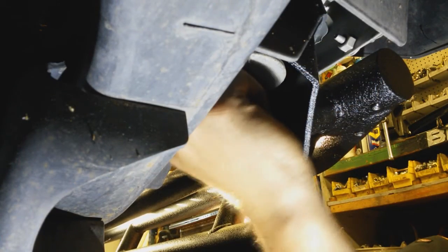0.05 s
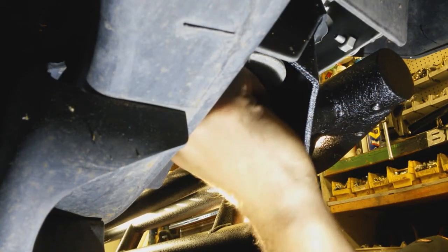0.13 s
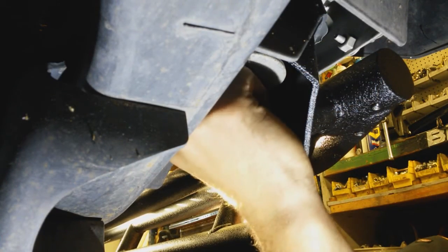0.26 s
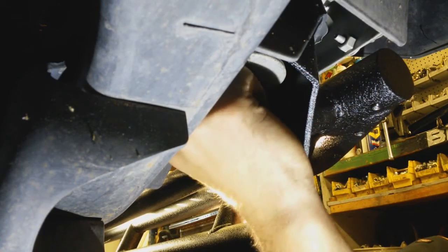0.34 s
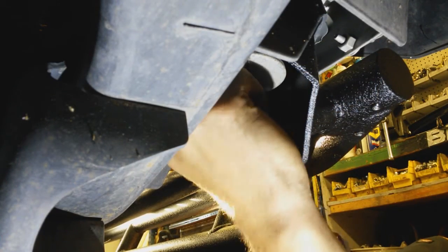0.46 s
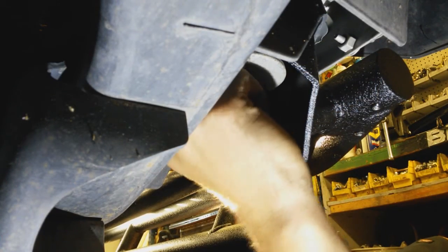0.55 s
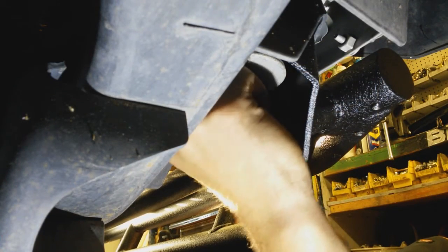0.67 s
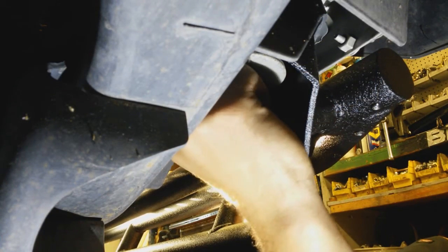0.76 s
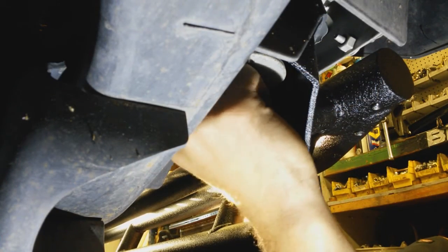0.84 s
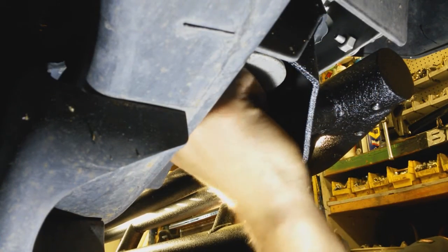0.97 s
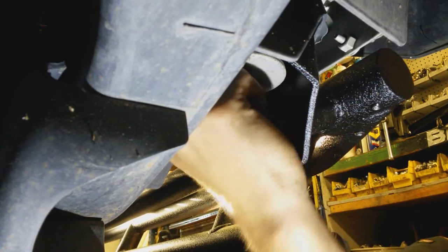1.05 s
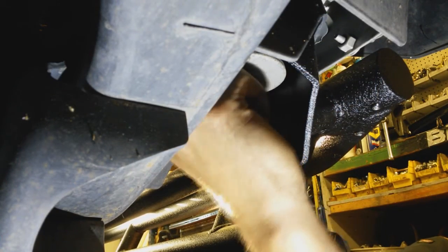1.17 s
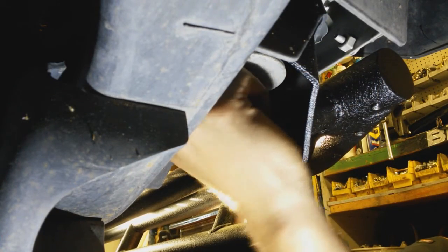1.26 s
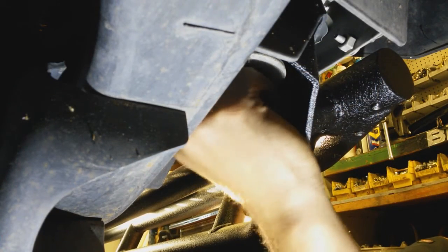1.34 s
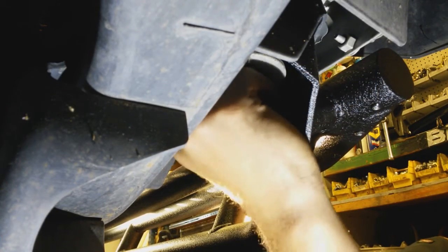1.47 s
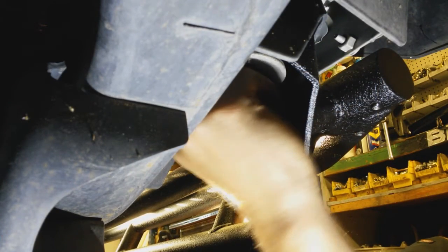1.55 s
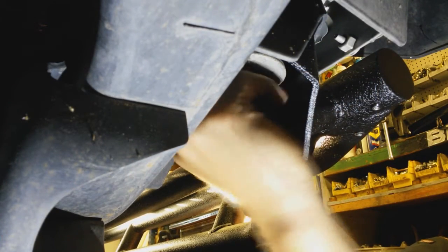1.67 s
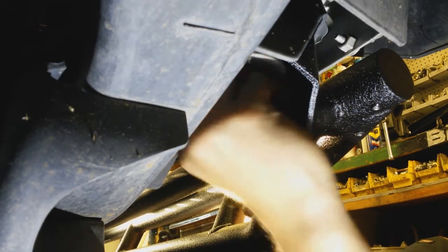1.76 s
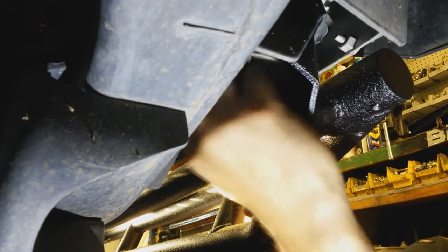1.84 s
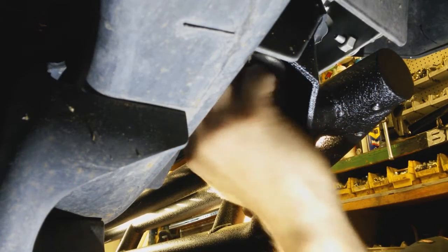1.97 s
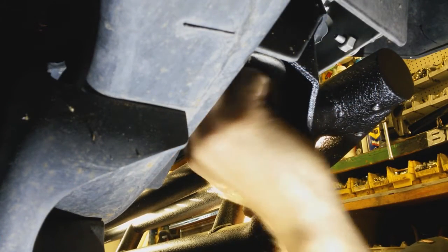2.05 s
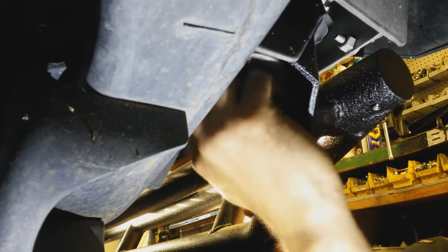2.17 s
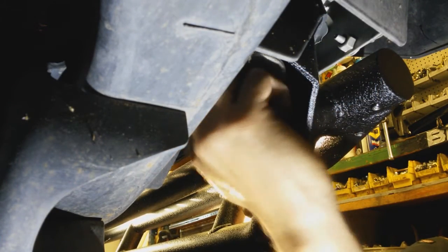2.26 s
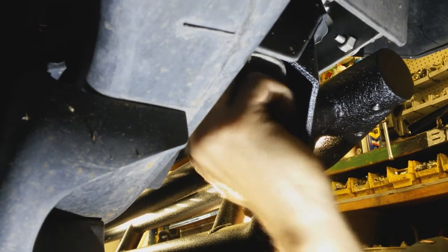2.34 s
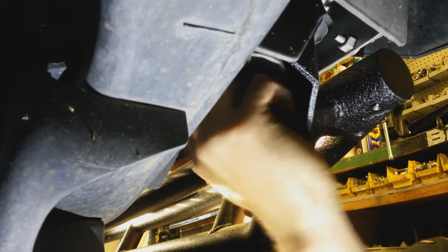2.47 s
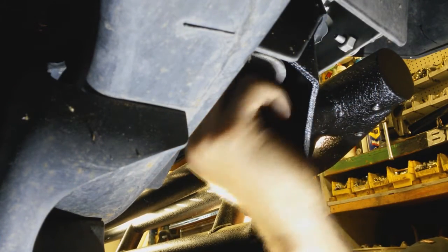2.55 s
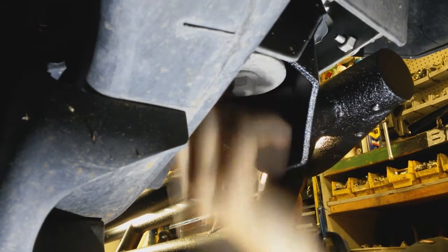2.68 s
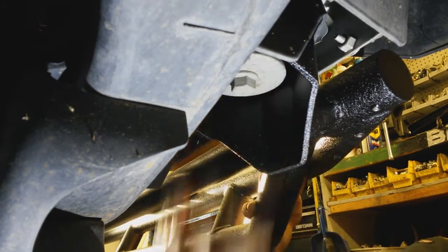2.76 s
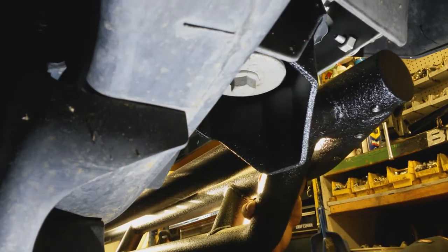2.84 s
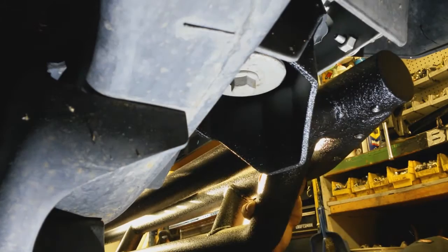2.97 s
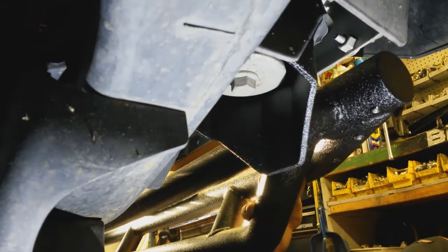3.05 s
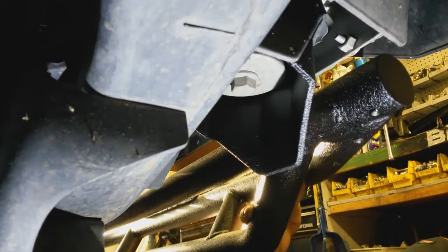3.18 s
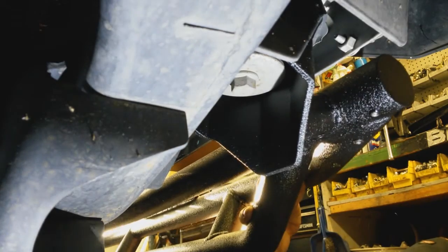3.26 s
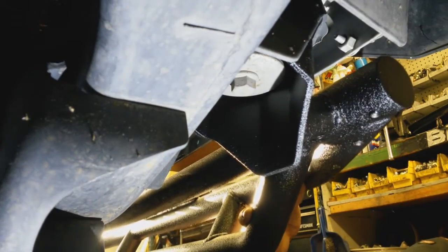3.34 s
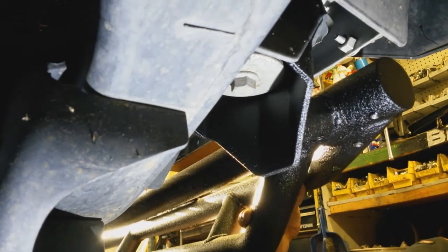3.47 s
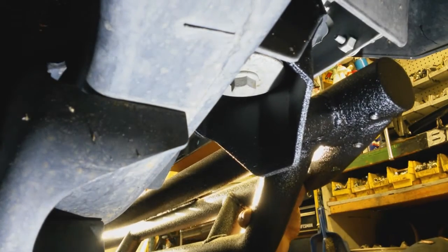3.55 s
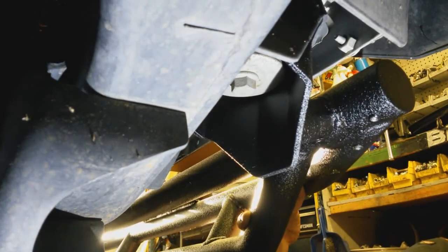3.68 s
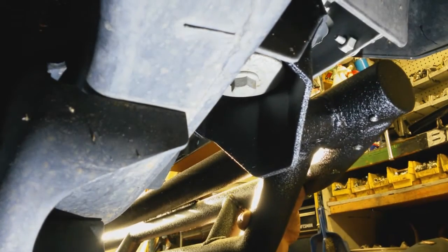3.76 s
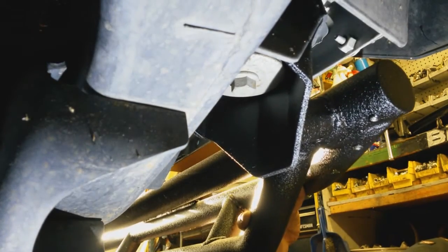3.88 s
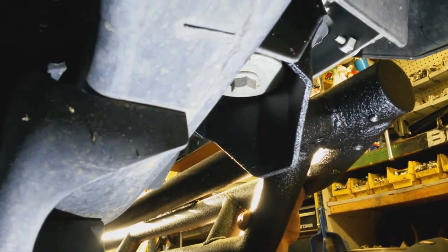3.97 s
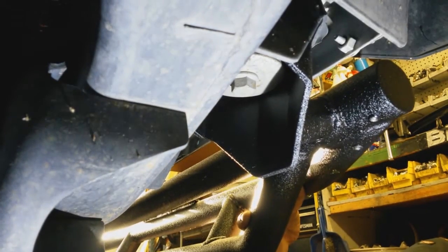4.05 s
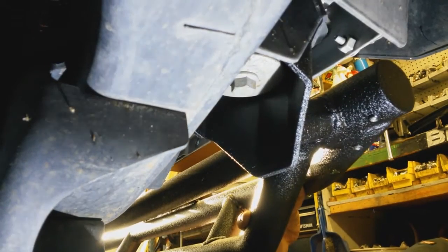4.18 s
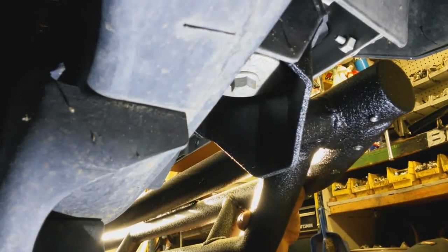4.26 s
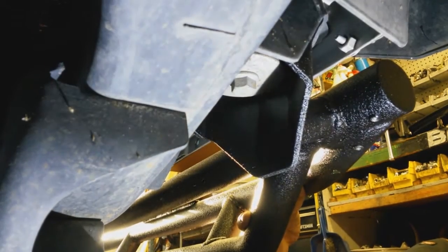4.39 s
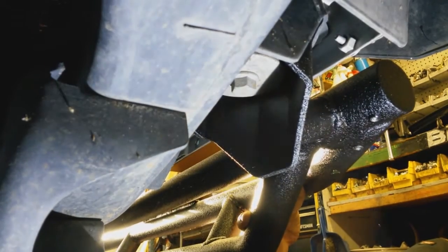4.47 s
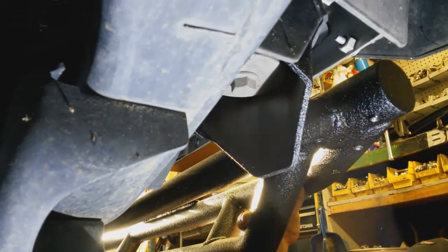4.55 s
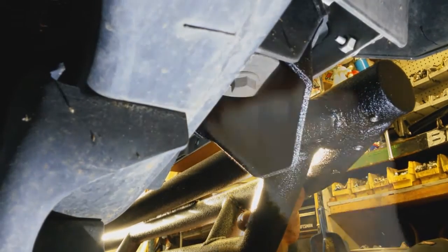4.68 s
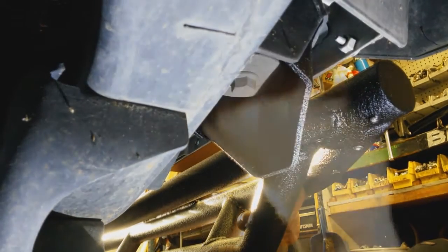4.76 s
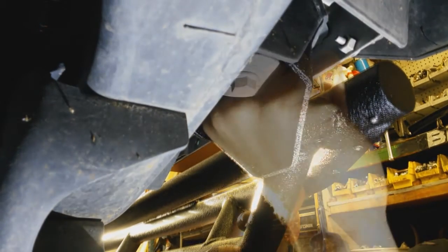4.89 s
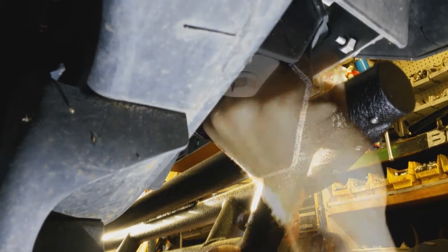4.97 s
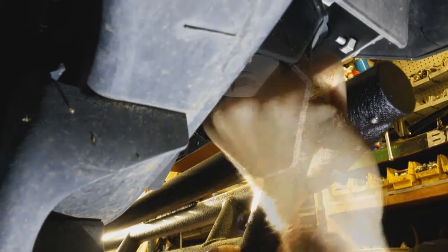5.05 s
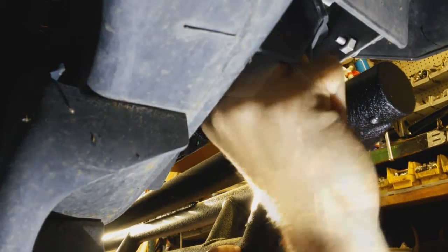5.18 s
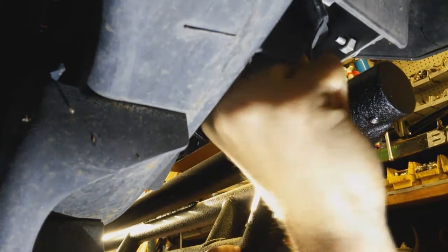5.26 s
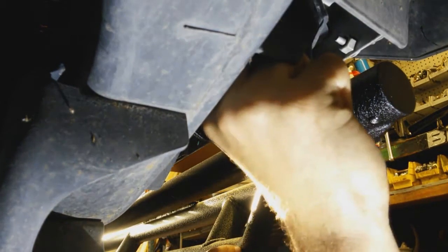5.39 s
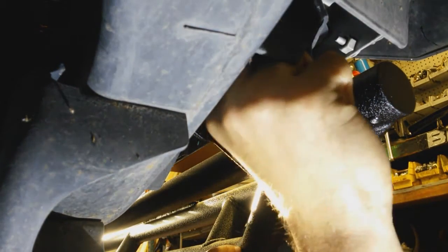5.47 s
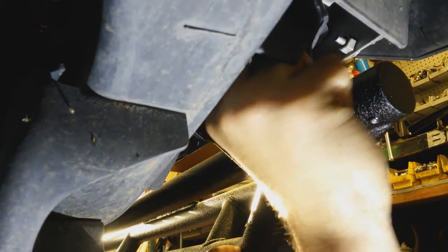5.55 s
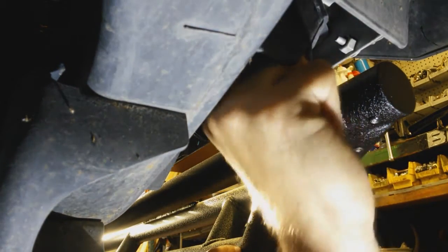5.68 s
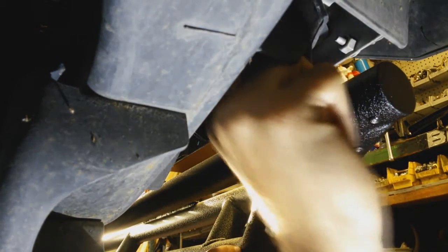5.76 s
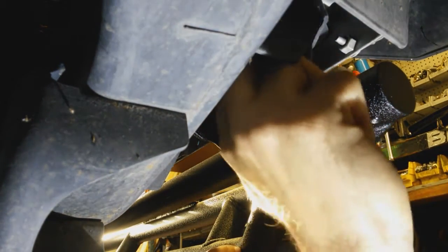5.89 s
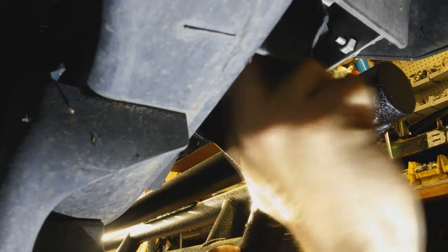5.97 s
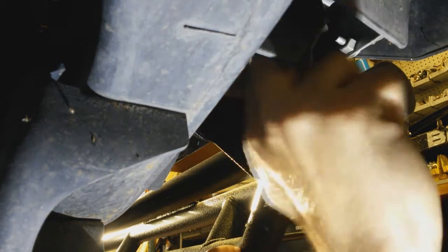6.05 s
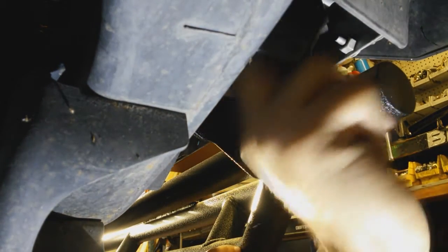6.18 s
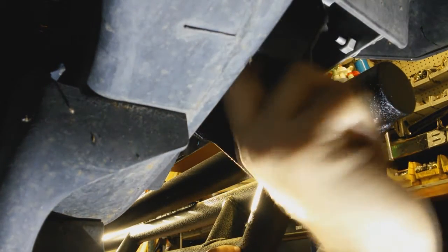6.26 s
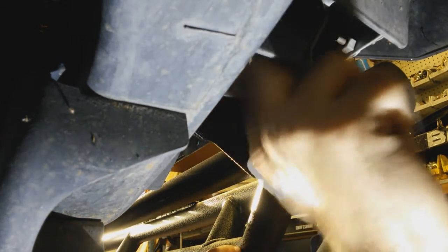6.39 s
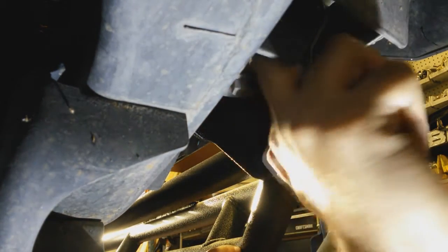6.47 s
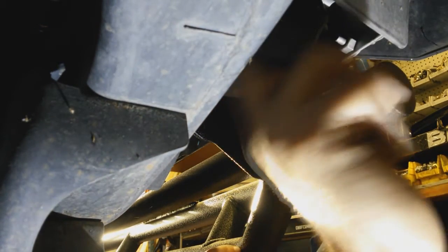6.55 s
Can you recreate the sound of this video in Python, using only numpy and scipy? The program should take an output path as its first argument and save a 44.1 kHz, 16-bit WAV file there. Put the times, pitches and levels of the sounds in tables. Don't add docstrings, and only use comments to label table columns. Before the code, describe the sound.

Close, hard metallic knocks and small scrapes of loose hardware on sheet steel, a quiet pause with tiny ticks, then ringing clacks from a steel socket.

```python
import sys
import numpy as np
from scipy import signal
from scipy.fft import rfft, irfft, next_fast_len
from scipy.io import wavfile
from scipy.ndimage import uniform_filter1d, map_coordinates

SR = 44100
rng = np.random.default_rng(int(sys.argv[2]) if len(sys.argv) > 2 else 0)


def wav_record(signal):
    frames = np.transpose(np.atleast_2d(signal))
    bounded = np.clip(frames, -1, 1)
    quanta = np.round(bounded * 32767).astype(np.int16)
    wavfile.write(sys.argv[1], SR, quanta)


def volts(x):
    e = np.asarray(x, float) / 20
    return 10 ** e


N = 292101

# time in seconds, shaft turns a second, load in dB.
ENGINE_RUN = [(0, 21, -9), (.45, 21.7, 2.5), (1.15, 24.3, -2), (1.95, 25.4, 3.5), (2.3, 26.4, -2),
              (2.7, 26.5, 4), (2.88, 26.5, 0), (2.97, 21, -3.5), (3.4, 19, -2.5), (3.7, 18.2, -13),
              (6.62, 18, -11)]
# pitch in Hz, level in dB, time to fall 60 dB in seconds.
BRACKET_MODES = [(848, -19.5, 0.24), (921, -10.5, 0.29), (1576, -7.5, 0.49), (1803, -22, 0.17),
                 (2610, -16.5, 0.22), (3050, 2.5, 0.29), (3195, 0, 0.96), (3536, -22, 0.22),
                 (4846, -12.5, .17), (4700, -12, 0.3)]
# pitch in Hz, level in dB, time to fall 60 dB in seconds.
WASHER_MODES = [(1180, -6.5, 0.42), (1460, -10, 0.081), (1803, -7.5, 0.45), (2280, -4, 0.41),
                (2510, -26, 0.44), (2830, -48, 0.25), (3430, -4, 0.59), (3480, -17, 0.23),
                (5150, -32, 0.27), (5168, -1, 0.3)]


def unit(x):
    return x / np.sqrt(np.mean(x ** 2) + 1e-20)


def along(points, hz):
    f, v = np.transpose(points)
    return np.interp(np.log(hz + 1), np.log(f + 1), v)


def curves(rows):
    s, *cols = np.transpose(rows)
    return [np.interp(np.arange(N) / SR, s, c) for c in cols]


def wobble(rate):
    points = rng.standard_normal(int(N * rate / SR) + 4)
    return map_coordinates(points, [np.arange(N) * rate / SR])


def filtered(x, response):
    m = next_fast_len(x.shape[-1] + 2048)
    spectrum = rfft(x, m) * response(np.fft.rfftfreq(m, 1 / SR))
    return irfft(spectrum, m)[..., :x.shape[-1]]


def paired(a, b, alike):
    turn = np.arccos(np.clip(alike, -1, 1)) / 2
    shared, apart = np.cos(turn) * a, np.sin(turn) * b
    return np.array([shared + apart, shared - apart])


def shop():
    # frequency in Hz, level in dB per Hz.
    air_tone = [(15, -57.5), (25, -20), (81, -8), (135, -13.5), (163, -11), (327, -16), (364, -12),
                (405, -19), (463, -17.5), (1150, -34), (1970, -37.5), (2310, -35.5), (3270, -41),
                (14500, -44.5), (15000, -62)]
    # frequency in Hz, likeness from 0 to 1.
    likeness = [(60, 0.84), (240, 0.43), (940, 0.35), (3700, 0.19), (14600, 0.097)]
    # pitch in Hz, level in dB.
    mains_lines = [(360, -79), (480, -71)]
    # time in seconds, level in dB.
    hiss_level = [(0, -59.5), (1.3, -60.5), (2.95, -63.5), (3.35, -58.5), (3.85, -60.5), (4, -65),
                  (4.6, -63), (5.3, -65.5), (6.62, -60)]
    load_db = curves(ENGINE_RUN)[1]
    rumble_db = -59.5 + 0.2 * load_db
    deep_db = -64.5 + 2.4 * wobble(1.5)

    def middle_and_side(hz):
        turn = np.arccos(np.clip(along(likeness, hz), -1, 1)) / 2
        return volts(along(air_tone, hz)) * [np.cos(turn), np.sin(turn)]

    mid, side = filtered(rng.standard_normal((2, N)), middle_and_side)
    air = np.array([mid + side, mid - side])
    deep = filtered(air, lambda hz: 1 / (1 + (hz / 100) ** 4))
    low = filtered(air, lambda hz: 1 / (1 + (hz / 900) ** 4))
    hiss = filtered(air - low, lambda hz: 1 + 1.6 / (1 + ((hz - 5600) / 900) ** 2))
    mains = 0
    for hz, db in mains_lines:
        mains = mains + volts(db + 1.5 * wobble(7.4)) * np.sin(2 * np.pi * hz * np.arange(N) / SR)
    rumble = volts(deep_db - 1.5) * unit(deep)
    rumble = rumble + volts(rumble_db + 0.92 + 0.5 * wobble(4.2)) * unit(low - deep)
    return rumble + volts(curves(hiss_level)[0] + 0.26 * wobble(1.3)) * unit(hiss) + mains


def engine():
    # multiple of the shaft speed, level in dB.
    multiples = [(4, -70), (5, -61), (7, -63)]
    # centre in Hz, width in Hz, boost in dB.
    room_booms = [(90, 8, 6), (132.5, 3, 9), (177.5, 3.5, 11)]
    shaft_hz, load_db = curves(ENGINE_RUN)
    hum = 0
    for k, db in multiples:
        hz = k * shaft_hz
        boom_db = sum(top_db / (1 + ((hz - c) / w) ** 2) for c, w, top_db in room_booms)
        loudness = volts(db + load_db + boom_db + 1.1 * wobble(6.2))
        hum = hum + loudness * np.sin(2 * np.pi * np.cumsum(hz) / SR + 0.3 * wobble(31))
    return hum


def sheet_steel(count, wide_hz):
    centre = rng.uniform(583.5, 14000, (count, 1))
    return 1 / (1 + ((np.arange(SR // 20) * 10 - centre) / wide_hz) ** 2)


def struck(panel, spread_db):
    power = volts(2 * spread_db * rng.standard_normal(len(panel))) @ panel
    response = np.sqrt(power / uniform_filter1d(power, size=80))
    return lambda f: np.interp(f / 10, np.arange(len(power)), response)


def blows(events, modes, t60, knock_db, rise, ring_db, crack_db, snap, gain_db):
    # frequency in Hz, level in dB per Hz.
    crack_tone = [(210, -40.5), (350, -15.5), (403, -53.5), (552, -7.5), (700, -21.5), (973, -9.5),
                  (1310, -13), (1800, -13), (3120, -10), (3370, -7.5), (5330, 1.5), (12900, -20),
                  (15000, -43.5)]
    out, t = np.zeros((2, N + SR)), np.arange(SR // 3) / SR
    hz, level, long = np.transpose(modes)[:, :, None]
    steel = sheet_steel(count=200, wide_hz=22)
    swell = 1 - np.exp(-(t / rise) ** 2)
    for s, db, mid_db, edge_db in events:
        low_db = knock_db + 0.6 * mid_db - 0.42 * db
        colour = [(300, low_db + 31.0), (900, low_db + 29.5), (2100, mid_db + 27),
                  (4800, 0), (6500, 0.009), (9500, edge_db + 21.5)]
        sheet = paired(*rng.standard_normal((2, len(t))), alike=0.14)
        sheet = unit(filtered(sheet, lambda f: volts(along(crack_tone, f))))
        panel = struck(steel, spread_db=3.5)
        dull = filtered(sheet, lambda f: panel(f) / (1 + (f / 6000) ** 4))
        dull = dull - filtered(dull, lambda f: 1 / (1 + (f / 2000) ** 4)) * np.exp(-t / 0.0044)
        bright = filtered(sheet, lambda f: panel(f) / (1 + (6000 / (f + 1)) ** 4) / (1 + (f / 11500) ** 4))
        chatter = volts(7.5 * uniform_filter1d(rng.standard_normal(len(t)), size=200))
        tail = chatter * (dull * volts(-60 * t / t60) + bright * volts(-60 * t / (0.49 * t60)))

        chance = rng.standard_normal((4, len(modes), 1))
        decay = -60 * t / np.minimum(long, t60)
        twin = chatter * np.cos(2 * np.pi * hz / 150 * chance[3] * t + chance[0])
        strength = volts(level + 2.2 * chance[0] + decay) * twin
        ring = [np.sum(strength * np.sin(2 * np.pi * hz * t + 1.2 * turn), axis=0) for turn in chance[1:3]]

        crack = filtered(sheet, lambda f: 1 / (1 + (1200 / (f + 1)) ** 2)) * volts(crack_db - 60 * t / snap)
        blow = swell * (crack + tail + volts(ring_db) * np.array(ring))
        blow = filtered(blow, lambda f: volts(along(colour, f)))
        start = round((s - 1.2 * rise) * SR) + len(t)
        out[:, start:][:, :len(t)] += volts(db + gain_db) * blow
    return out[:, len(t):][:, :N]


def first_contacts():
    # start in seconds, peak level in dB, body level in dB, bright edge level in dB.
    nut_hits = [
        (-.006, -7, -17.5, -16),
        (.136, -28, -17, -22.5),
        (.144, -5.5, -20, -16.5),
    ]
    return blows(nut_hits, BRACKET_MODES, t60=0.26, knock_db=-19, rise=0.0034, ring_db=-13.5,
                 crack_db=15.5, snap=0.024, gain_db=-8.5)


def single_modes(rows, rise, beat_db, t60_at_1k, steep, rough):
    out, t = np.zeros(N + SR), np.arange(SR // 2) / SR

    def unsteady():
        return map_coordinates(rng.standard_normal(len(t) // 300 + 4), [np.arange(len(t)) / 300])

    for s, db, hz in rows:
        flutter, drift = unsteady(), unsteady()
        decay_db = -60 * t / (t60_at_1k * (hz / 1000) ** -steep)
        loudness = volts(db + beat_db * flutter + decay_db) * (1 - np.exp(-t / rise))
        tone = np.sin(2 * np.pi * hz * t + rough * hz / 3000 * drift)
        out[round(s * SR):][:len(t)] += loudness * tone
    return out[:N]


def pings():
    # start in seconds, level in dB, pitch in Hz.
    ping_times = [(.005, -32.5, 2400), (.146, -34, 3198), (.148, -34.5, 1803), (.15, -36, 8930),
                  (.152, -55, 2500), (.16, -37.5, 921), (.826, -57, 1900), (2.3, -40, 3195),
                  (4.97, -54, 6700), (5.665, -44.5, 5350), (5.69, -49.5, 3150), (5.855, -57, 5470),
                  (6.104, -36, 5900), (6.106, -34, 5450), (6.205, -46, 1944), (6.225, -42, 5490),
                  (6.13, -50, 3150), (6.24, -41, 3150), (6.33, -52, 3150), (6.515, -30, 5490),
                  (6.53, -34, 3195), (6.545, -34, 3080)]
    ringing = single_modes(ping_times, rise=0.0046, beat_db=3.5, t60_at_1k=0.47, steep=0.1, rough=1.3)
    return ringing * volts([[-3], [2.5]])


def frame_knocks():
    # start in seconds, level in dB, pitch in Hz.
    knock_times = [(.05, -36, 592), (.86, -44, 627), (.998, -32, 2060), (1.391, -47.5, 690),
                   (1.393, -46.5, 1151), (1.485, -37.5, 2100), (2.045, -33.5, 474), (2.29, -37, 595),
                   (2.36, -45.5, 451.9), (2.6, -37.5, 480), (2.72, -41, 500.5), (3.531, -48, 3870),
                   (3.572, -45, 247), (3.573, -44.5, 658), (3.573, -42, 1470), (4.332, -33, 763),
                   (4.33, -41.5, 331), (4.333, -44, 1280), (4.345, -45, 1660), (4.388, -25, 6770),
                   (4.912, -13, 7060), (5.865, -35, 1734), (6.102, -8.5, 6440), (6.23, -39, 640),
                   (6.52, -43, 635)]
    knocks = single_modes(knock_times, rise=0.00053, beat_db=-0.5, t60_at_1k=0.046, steep=0.5, rough=1.3)
    return knocks * volts([[-1.5], [1.5]])


def room(x):
    # frequency in Hz, time to fall 60 dB in seconds.
    wall_decay = [(500, 0.22), (3000, 0.31), (6000, 0.089), (12000, 0.16)]
    hz, t, z = signal.stft(rng.standard_normal((2, SR * 3 // 4)), SR, nperseg=256)
    fading = z * volts(-60 * t / along(wall_decay, hz)[:, None])
    tail = signal.istft(fading, SR, nperseg=256)[1]
    late = np.pad(x, (700, 0))[None]
    return signal.fftconvolve(late, tail / np.linalg.norm(tail[0]), axes=1)[:, :N]


def washer_slides():
    # start in seconds, peak level in dB, body level in dB, bright edge level in dB.
    slide_times = [
        (.388, -40.5, -20, -44),
        (.965, -65, -20, -22),
        (1.45, -32, -8.5, -22),
        (1.689, -47, -1, -10),
        (1.989, -40.5, 1.5, -15),
        (2.348, -25, -9, -14.5),
        (2.598, -27.5, -10.5, -9),
    ]
    return blows(slide_times, BRACKET_MODES + WASHER_MODES, t60=0.54, knock_db=-26, rise=0.0046, ring_db=-23,
                 crack_db=2.0, snap=0.0284, gain_db=-10.5)


def washer_blows():
    # start in seconds, peak level in dB, body level in dB, bright edge level in dB.
    washer_hits = [(.495, -37.5, -8.5, -19), (.651, -35.5, -1, -25), (.826, -38, 5.5, -44),
                   (.839, -31.5, -11, -27), (.978, -38, -15, -19), (.995, -25, -6.5, -17.5),
                   (1.153, -41.5, -10, -40), (1.223, -48.5, -13, -28), (1.473, -20, -19.5, -19),
                   (1.492, -31, -2, -37), (1.545, -26.5, -10, -17), (1.556, -8.5, -14, -30),
                   (1.588, -35.5, 4.5, -5), (1.813, -32.5, -9.5, -35), (1.91, -10.5, -20, -31.5),
                   (2.004, -19, -17.5, -34), (2.04, -19, -10, -19), (2.151, -25.5, -20, -42),
                   (2.265, -37, -30, -42), (2.272, -7.5, -15, -19.5), (2.411, -17.5, -15.5, -28.5),
                   (2.43, -28.5, -10, -22), (2.553, -9, -17, -17.5), (2.62, -16.5, -14, -43),
                   (2.648, -20, -20, -24.5), (2.708, -19.5, -12.5, -23.5), (2.726, -28.5, -10, -34)]
    return blows(washer_hits, BRACKET_MODES + WASHER_MODES, t60=0.19, knock_db=-21, rise=0.0029, ring_db=-16,
                 crack_db=1.5, snap=0.03, gain_db=-10.0)


def scrape():
    # time of most pressure in seconds, level in dB, rise in seconds, fall in seconds.
    strokes = [
        (1.49, -42.5, .05, .07),
        (1.69, -43.5, 0.15, 0.055),
        (2.02, -55, .07, 0.93),
        (2.382, -40, 0.036, 0.094),
        (2.769, -39, 0.15, .03),
        (6.28, -37, 0.12, .11),
    ]
    # frequency in Hz, level in dB per Hz.
    grit_tone = [(350, -29.5), (600, -1), (1150, -8.5), (1310, -8), (2160, -6.5), (4520, -8.5),
                 (5690, -4.5), (13300, -26), (15000, -53)]
    t = np.arange(N) / SR
    level = 0
    for s, db, rise, fall in strokes:
        level = level + volts(db - 28 * np.maximum((s - t) / rise, (t - s) / fall))
    grains = rng.standard_normal((2, N)) * volts(1.7 * wobble(210) + 4.0 * wobble(30))

    def washer_rings(f):
        return 1 + sum(volts(db + 6) * 60 / (60 + 1j * (f - c)) for c, db, _ in WASHER_MODES)

    grit = filtered(paired(*grains, alike=0.51), lambda f: volts(along(grit_tone, f)) * washer_rings(f))
    return volts(-3.0) * level * unit(grit)


def soft_bumps():
    # start in seconds, peak level in dB, body level in dB, bright edge level in dB.
    bump_times = [
        (3.236, -32.5, -22, -22),
        (4.327, -41.5, -2, -17.5),
        (4.345, -39, -7, -12),
    ]
    return blows(bump_times, WASHER_MODES, t60=0.25, knock_db=-18, rise=0.002, ring_db=-30,
                 crack_db=8.5, snap=0.027, gain_db=-10)


def stray_ticks():
    # start in seconds, peak level in dB, body level in dB, bright edge level in dB.
    tick_times = [
        (3.531, -48, -14, -30),
        (3.573, -42.5, 0, -17),
        (3.72, -48, -28, -21),
        (3.929, -53, -44, -14),
        (4.387, -20.5, -28, -18.5),
        (4.581, -59, -5, -28),
        (4.807, -55.5, -4.5, -25),
        (4.883, -55.5, -13.5, -15),
    ]
    return blows(tick_times, WASHER_MODES, t60=0.072, knock_db=-14.5, rise=0.00032, ring_db=-23,
                 crack_db=14.5, snap=0.0064, gain_db=-13.5)


def pump():
    # pitch in Hz, level in dB.
    pump_lines = [(43.1, -65.5), (96.9, -71), (134.6, -69), (150.7, -65.5)]
    on_s, off_s, fade_s = 3.63, 5.25, 0.34
    t = np.arange(N) / SR
    running = np.clip(np.minimum(t - on_s, off_s - t) / fade_s + 0.5, 0, 1)
    hum = 0
    for hz, db in pump_lines:
        loudness = volts(db + 2 + 1.4 * wobble(3.07))
        hum = hum + loudness * np.sin(2 * np.pi * hz * t + 0.37 * wobble(15))
    return running * hum


def socket_blows():
    # start in seconds, peak level in dB, body level in dB, bright edge level in dB.
    socket_hits = [(4.911, -21.5, -23, -12), (4.968, -23, -16.5, -22), (5.503, -49, -10, -33),
                   (5.652, -46, -12, -19), (5.66, -18, -22.5, -22), (5.853, -30, -13.5, -22.5),
                   (6.102, -10, -22.5, -20.5), (6.206, -32, -8, -18), (6.22, -12.5, -19.5, -28),
                   (6.284, -37.5, -34, -19), (6.509, -6, -26, -16.5)]
    # pitch in Hz, level in dB, time to fall 60 dB in seconds.
    socket_modes = [(2245, -19, 0.17), (3150, -34, .4), (3757, -4, 0.2), (5300, 7.5, 0.11), (5380, 9, 0.13),
                    (5720, -15, 0.12), (6304, -4.5, 0.15)]
    return blows(socket_hits, socket_modes, t60=0.26, knock_db=-22.5, rise=0.00079, ring_db=-5.5,
                 crack_db=3.0, snap=0.048, gain_db=-12)


def placed(pair, pan_db, lag):
    late = filtered(pair[0], lambda hz: np.exp(-2j * np.pi * hz * lag / SR))
    return np.array([volts(pan_db / 2) * late, volts(-pan_db / 2) * pair[1]])


def scene():
    left_lag = [
        6,
        4,
        17,
    ]
    nut = first_contacts() + washer_blows() + washer_slides() + scrape()
    stray = soft_bumps() + stray_ticks()
    near = placed(nut, -5.5, left_lag[0])
    near = near + placed(stray, -2.9, left_lag[1])
    near = near + placed(socket_blows(), -7.5, left_lag[2])
    echo = volts(-13.5) * room(near[1])
    return near + echo + frame_knocks() + pings() + shop() + engine() + pump()


def roll_off(x):
    return signal.sosfilt(signal.butter(12, 15200, fs=SR, output="sos"), x)


def record(dry):
    heard = filtered(dry, lambda hz: 1 / (1 + (30 / (hz + 1)) ** 6))
    return roll_off(np.clip(heard, -1, 1))


dry = scene()
out = record(dry)
wav_record(out)
```